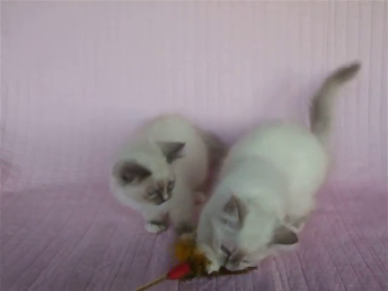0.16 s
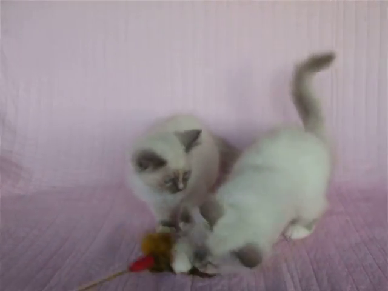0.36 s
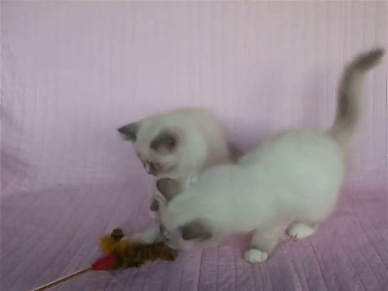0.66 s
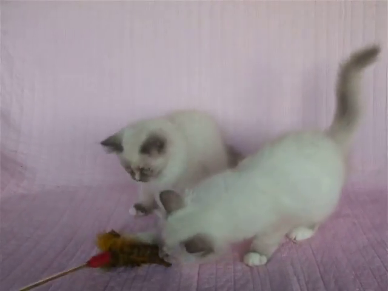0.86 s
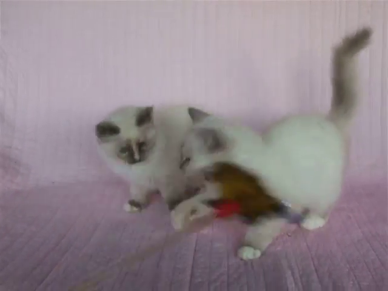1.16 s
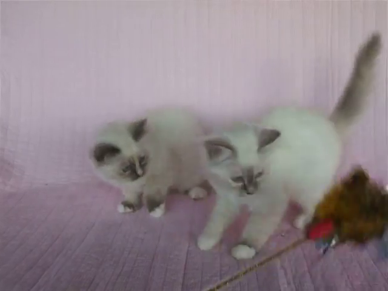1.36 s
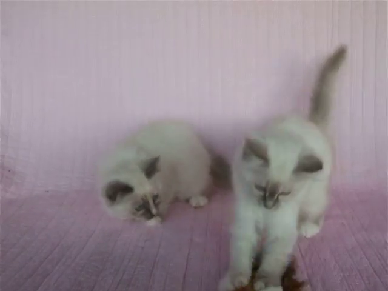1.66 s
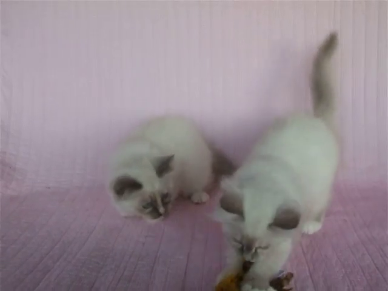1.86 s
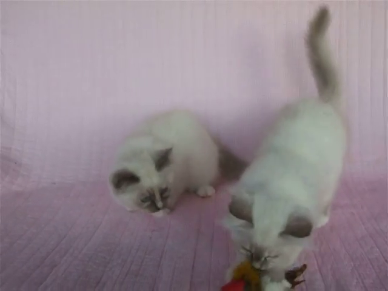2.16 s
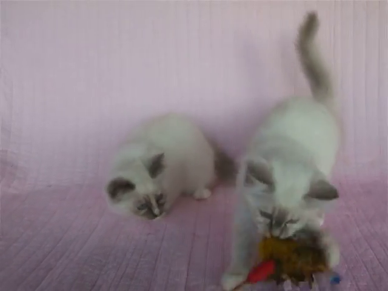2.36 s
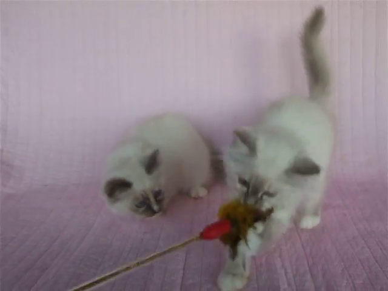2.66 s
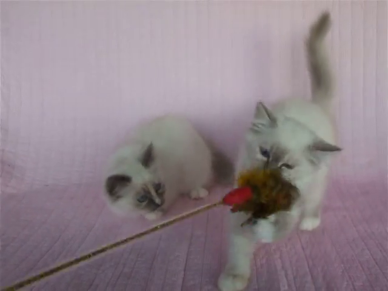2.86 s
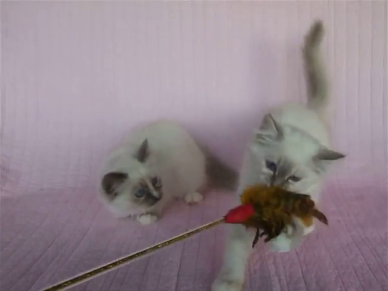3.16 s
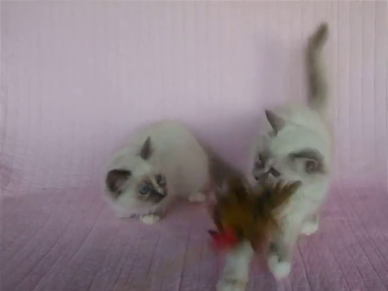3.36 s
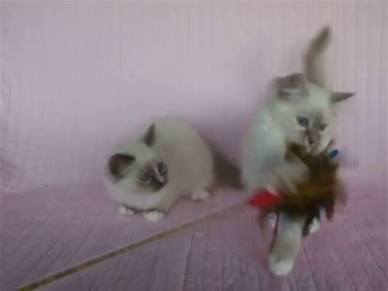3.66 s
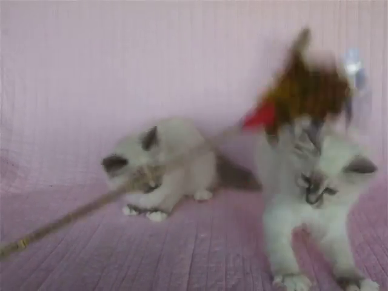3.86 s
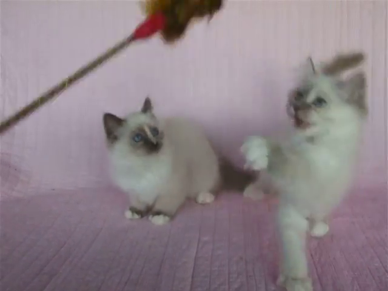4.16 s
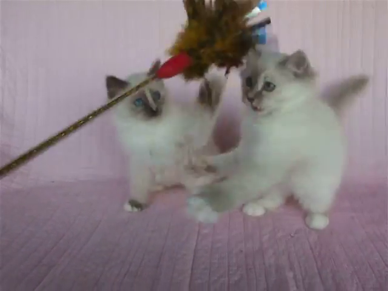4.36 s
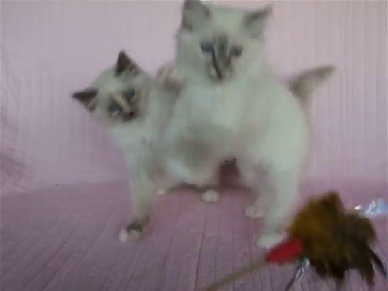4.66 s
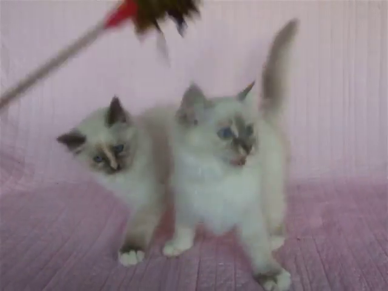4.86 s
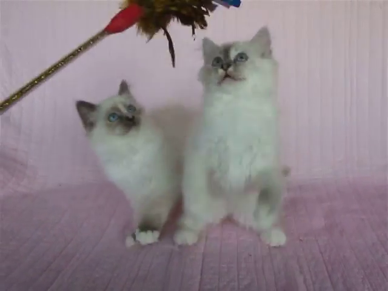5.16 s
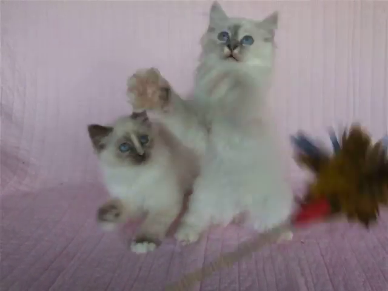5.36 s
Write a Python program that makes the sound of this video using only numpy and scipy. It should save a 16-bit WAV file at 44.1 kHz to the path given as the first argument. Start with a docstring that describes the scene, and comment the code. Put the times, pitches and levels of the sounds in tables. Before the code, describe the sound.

Quiet start with ticking camera focus motor, then bursts of crisp feathery rustle, sharp claw clicks and muffled paw thuds in a small room.

```python
"""Feathers and foil strips of a toy wand swish across a carpet, close to a small camera, as two kittens scrabble.
Each swish is a shower of tiny crackles ringing in the barbs, over duller friction; claws snap and tick
as short rings, cracks and taps, and paws land as damped thuds in a small quiet room.
The camera's focus motor ticks along in short steps, as rings and rasps on a fixed clock.
Beneath lie a low hum, a thin whine, rumble and microphone hiss, with a faint squeak and a whirr."""
import sys
import numpy as np
from scipy import signal
from scipy.fft import rfft, irfft
from scipy.io import wavfile
from scipy.ndimage import uniform_filter1d

SR = 44100
rng = np.random.default_rng(int(sys.argv[2]) if len(sys.argv) > 2 else 0)


def wrap_up_sound(samples):
    """Save the sound to the file named by the first command line argument, as 16-bit audio."""
    columns = np.atleast_2d(samples).T
    # keep every value between -1 and 1, then stretch to whole-number steps
    tamed = np.clip(columns, -1, 1)
    steps = np.round(tamed * 32767).astype(np.int16)
    wavfile.write(sys.argv[1], SR, steps)


N = 243873
TIME = np.arange(N) / SR  # [s]


def amp(db):
    """Decibels to gain."""
    return 10 ** (np.asarray(db) / 20)


def unit(x):
    """Scale to rms 1."""
    return x / np.sqrt(np.mean(x ** 2))


def colour(x, points, size=4096):
    """Causal minimum-phase filter through (frequency [Hz], gain [dB]) points; keeps the power of white noise."""
    hz, db = np.transpose(points)
    f = np.arange(size + 1) * SR / (2 * size)
    gain = unit(amp(np.interp(np.log(f + 1), np.log(hz), db)))
    cepstrum = irfft(np.log(gain))
    # folding the cepstrum forward in time makes the filter causal
    cepstrum[1:size] *= 2
    cepstrum[size + 1:] = 0
    impulse = irfft(np.exp(rfft(cepstrum)))[:size]
    return signal.oaconvolve(x, impulse)[:N]


def resonate(x, hz, width_hz):
    """One resonance, gain 1 at its centre."""
    b, a = signal.iirpeak(hz, hz / width_hz, fs=SR)
    return signal.lfilter(b, a, x)


def ring(x, hz, width_hz):
    """A resonance applied twice: it builds up over a few cycles and has steep skirts; rms 1."""
    return unit(resonate(resonate(x, hz, width_hz), hz, width_hz))


def narrow(hz, width_hz):
    """A narrow band of noise, rms 1."""
    return ring(rng.standard_normal(N), hz, width_hz)


def walk(rate):
    """Smooth random drift of rms 1, with rate new values a second."""
    k = int(SR / rate)
    held = np.repeat(rng.standard_normal(N // k + 1), k)
    return unit(uniform_filter1d(held, k)[:N])


def swell(t, rise, fall):
    """An envelope that grows up to t = 0 and dies away after it."""
    return np.exp(-np.minimum(np.maximum(-t / abs(rise), t / abs(fall)), 20))


def push(t, peak_s):
    """An envelope that reaches 1 after peak_s and falls off more slowly."""
    return t / peak_s * np.exp(1 - t / peak_s)


def add(out, s, sound):
    """Mix a short sound in at time s."""
    i = max(int(s * SR), 0)
    out[i:i + len(sound)] += sound[:max(N - i, 0)]


def crackle(rate, spread_db, smooth):
    """Tiny slips of unequal size, rate a second, plus a share of smooth friction; even in power."""
    chance, size, friction = rng.random(N), rng.exponential(size=N), rng.standard_normal(N)
    at = chance < rate / SR
    slips = np.zeros(N)
    slips[at] = np.sign(friction[at]) * amp(spread_db * np.minimum(size[at], 3.0))
    return unit(unit(slips / np.sqrt(rate)) + smooth * friction)


# every stroke swells for a share of its length, sags as it loses speed, and dies away
SWISH_ATTACK_SHARE, SWISH_SAG_DB, SWISH_RELEASE_S = .25, 2.5, 0.0088


def stroke(t, length):
    """Level of one stroke: attack, a sagging hold of the given length, release."""
    attack = np.minimum(t / (SWISH_ATTACK_SHARE * length), 1)
    hold = amp(-SWISH_SAG_DB * np.minimum(t / length, 1))
    return attack * hold * np.exp(-np.maximum(t - length, 0) / SWISH_RELEASE_S)


# strokes of the feather toy: (start [s], length [s], relative level [dB])
STROKES = [(0.374, 0.092, -45), (0.498, 0.065, -45.5), (1.03, 0.071, -42.5), (1.215, 0.065, -38),
           (1.269, 0.058, -34.5), (1.422, 0.053, -38.5), (1.494, 0.028, -31), (1.529, .025, -38),
           (1.553, .01, -33.5), (1.642, 0.046, -40.5), (3.378, 0.033, -40), (3.44, .015, -26),
           (3.459, 0.051, -36.5), (3.555, 0.018, -37), (3.586, 0.021, -37), (3.641, 0.023, -36.5),
           (3.693, .025, -31.5), (3.72, 0.041, -29), (3.775, .035, -32.5), (3.827, 0.014, -26),
           (3.904, .02, -30), (3.93, .025, -33), (4.01, .03, -35), (4.054, .035, -39), (4.135, 0.058, -33),
           (4.287, .035, -34), (4.406, .035, -31.5), (4.564, 0.0088, -26.5), (4.573, .012, -23),
           (4.597, 0.058, -31), (4.896, .04, -40), (5.092, 0.025, -41), (5.24, .045, -40.5),
           (5.323, .022, -32), (5.343, .008, -21.5), (5.38, 0.0072, -40.5)]
# fur and feathers dragging on the carpet between strokes: (time [s], relative level [dB])
DRAG = [(0.0, -54), (0.3, -59), (0.75, -64), (1.1, -48.5), (1.62, -47.5), (1.75, -59.5), (2.15, -67.5),
        (2.3, -53), (2.8, -59), (2.92, -50), (3.22, -54.5), (3.4, -47.5), (3.68, -46.5), (3.87, -41),
        (4.0, -47.5), (4.68, -42.5), (4.82, -48.5), (5.2, -50), (5.45, -45)]
# a stroke's dull body against its crisp top, thinner once the toy lifts off the carpet: (time [s], level [dB])
BODY_TO_TOP = [(0.4, -8), (1.1, -10), (1.55, -9.5), (1.67, -4), (3.4, -8), (4.0, -10.5), (4.2, -14.5),
               (4.65, -12.5), (5.33, -19), (5.45, -5)]
# rings of barbs and foil strips: (frequency [Hz], width of each pass [Hz], relative level [dB])
BARB_RINGS = [(3940, 1930, -5.5), (5320, 2030, -4), (6360, 2100, 1), (7080, 1880, 1), (7680, 2100, -2.5)]
# dull colour of carpet and fur, heard again in the claw taps: (frequency [Hz], relative gain [dB])
CARPET_COLOUR = [(100, -10), (300, -11.5), (550, -8), (900, -12.5), (1400, -4.5), (2200, 2.5), (3200, 1),
                 (5000, -14.5)]


def feathers(flutter_db=1.0):
    """Barbs and foil flick past each other: a crisp top, and a duller body where they rub on carpet and fur."""
    drag = amp(np.interp(TIME, *np.transpose(DRAG)) + flutter_db * walk(rate=31))
    stroke_power = np.zeros(N)
    for s, length, db in STROKES:
        add(stroke_power, s, (amp(db) * stroke(TIME[:SR // 4], length)) ** 2)
    body_to_top = amp(np.interp(TIME, *np.transpose(BODY_TO_TOP)))
    top_power = drag ** 2 + stroke_power
    body_power = (drag * amp(-9.5)) ** 2 + stroke_power * body_to_top ** 2
    # a harder stroke sets more barbs slipping; each size of barb rings at its own pitch
    rate = 850 * (top_power / amp(-45) ** 2) ** .18
    barbs = np.zeros(N)
    for hz, width, db in BARB_RINGS:
        barbs += amp(db) * ring(crackle(rate, spread_db=5.0, smooth=0.31), hz, width)
    top = unit(colour(barbs, [(1200, -17.5), (3000, -8.5), (4500, 1.0), (8000, -0.5), (11000, -9.5)]))
    body = colour(crackle(2.7 * rate, spread_db=2.5, smooth=0.62), CARPET_COLOUR)
    clumps = unit(amp(2.23 * walk(rate=430)))  # the barbs catch and let go in clumps
    return clumps * amp(0.5) * (top * np.sqrt(top_power) + body * np.sqrt(body_power))


# low hum that thins midway while its octave grows: (time [s], fundamental level [dB], octave level [dB])
HUM_LEVELS = [(0, -55.5, -67), (2.1, -56, -75), (3.3, -61.5, -63), (4.3, -56, -73.5), (5.53, -56, -72.5)]
# faint electronic whine: (frequency [Hz], level [dB])
WHINE_TONES = [(414, -85), (3875, -71.5), (7875, -66)]
# colour of the microphone hiss: (frequency [Hz], relative gain [dB])
HISS_COLOUR = [(70, -12), (125, -4.5), (400, -5), (560, -1.5), (700, -5), (900, -6), (1560, -6.5),
               (2030, -6), (2400, -7.5), (3900, -8.5), (4700, -8), (8000, -13)]
HUM_HZ, HISS_DB = 82.2, -51.0


def background():
    """A low hum with its octave and a thin whine share a slight pitch drift, over rumble and microphone hiss."""
    s, first_db, octave_db = np.transpose(HUM_LEVELS)
    phase = 2 * np.pi * np.cumsum(1 + 0.0012 * walk(rate=3)) / SR  # for a tone of 1 Hz
    hum = amp(np.interp(TIME, s, first_db)) * np.sin(HUM_HZ * phase)
    hum += amp(np.interp(TIME, s, octave_db)) * np.sin(2 * HUM_HZ * phase)
    whine = sum(amp(db) * np.sin(hz * phase) for hz, db in WHINE_TONES)
    hiss = colour(rng.standard_normal(N), HISS_COLOUR) * amp(0.55 * walk(rate=25))
    rumble = colour(rng.standard_normal(N), [(8, -11), (24, -3.5), (38, -12.5), (55, -10.5), (110, -13.5),
                                             (300, -40.0), (1000, -80.0)])
    tones = np.sqrt(2) * (hum + whine)  # the listed levels are rms
    return tones + amp(HISS_DB) * hiss + amp(-64.0) * rumble


# a narrow whirr: (time [s], level [dB])
WHIRR_LEVELS = [(2.5, -73), (2.63, -59), (3.2, -67.5), (4.8, -56.5), (5.1, -60), (5.2, -76)]


def squeak_and_whirr():
    """Two narrow bands of noise: a thin squeak at the start, and a faint whirr in the second half."""
    squeak = amp(-56) * swell(TIME - .03, rise=.04, fall=.025) * narrow(hz=3950, width_hz=130)
    whirr = amp(np.interp(TIME, *np.transpose(WHIRR_LEVELS))) * narrow(hz=2130, width_hz=250)
    return squeak + whirr


# paws landing on the carpet: (time [s], relative level [dB], thud pitch [Hz], rumble t60 [s])
LANDINGS = [(0.007, -40.5, 133, 0.19), (1.294, -40.5, 228, 0.072), (1.503, -39, 121, 0.12),
            (1.679, -45, 143, 0.13), (3.438, -36, 134, 0.16), (3.829, -40, 164, 0.1),
            (3.874, -35, 121, 0.043), (4.574, -45, 158, 0.12), (4.843, -30.5, 210, 0.08),
            (5.343, -40.5, 238, 0.047)]


def paws(thud_s=0.0069, scuff=0.44, slap_s=0.0011):
    """A soft pad slaps the pile and pushes the damped floor for a few cycles; a dull rumble trails behind."""
    thuds, slaps, tails = np.zeros(N), np.zeros(N), np.zeros(N)
    t = TIME[:SR // 4]
    heaviest_db = max(row[1] for row in LANDINGS)
    for s, db, hz, t60 in LANDINGS:
        grit = amp(db) * rng.standard_normal(len(t))
        weight = amp(1.1 * (db - heaviest_db))  # light landings barely reach the floor under the pile
        thud = np.sin(2 * np.pi * hz * t) * np.exp(-t / thud_s)
        add(thuds, s + slap_s, -weight * amp(db) * thud)
        add(slaps, s + slap_s, weight * grit * push(t, slap_s))
        add(tails, s, grit * np.exp(-np.log(1000) * t / t60))
    slap = colour(slaps, [(120, -5), (260, 2), (480, 2.5), (750, -1.5), (1500, 1), (2900, -3.5), (4200, -30.5)])
    rumble = colour(tails, [(80, -13.0), (190, -7.5), (330, -4.0), (580, 0.5), (1200, -14.5), (2800, -25.5),
                            (5000, -44.5)])
    return amp(1.0) * thuds + amp(-5.0) * slap + scuff * rumble


# single snaps of claws, quills and foil: (time [s], relative level [dB], ring pitch [Hz], tap trim [dB])
SNAP_EVENTS = [(0.1669, -26, 6330, -13), (1.505, -18, 5970, -11), (2.2014, -28.5, 6200, -11),
               (2.356, -27, 4600, -2), (2.543, -25.5, 4930, -2.5), (2.707, -16.5, 5700, -19),
               (3.0642, -28.5, 5100, -6), (3.325, -24.5, 5800, -1), (3.4335, -14.5, 6000, -15),
               (3.4452, -9.5, 6200, -14.5), (3.5926, -14.5, 6600, -15), (3.7573, -15.5, 6300, -11),
               (3.7834, -9.5, 6700, -29), (3.838, -13, 6550, -13), (4.128, -16.5, 6000, -18),
               (4.203, -17.5, 6860, -26), (4.442, -9.5, 7200, -23.5), (4.5717, -13, 7100, -19),
               (4.5759, -9, 5340, -9), (4.58, -12, 6240, -4), (4.8504, -21.5, 7140, -14),
               (5.349, -8, 6230, -13.5)]
# crisp colour of the cracks: (frequency [Hz], relative gain [dB])
CRACK_COLOUR = [(1500, -34), (3000, -31), (4000, -4), (5000, 3), (6200, -0.5), (7300, 4.5), (8200, -14),
                (9500, -5.5)]


def snaps(ring_s=0.00017, crack_s=0.00025, tap_s=0.00082, crack_share=.17):
    """A claw or quill lets go: a brief high ring, a crisp crack and a longer, duller tap on the carpet."""
    rings, cracks, taps = np.zeros(N), np.zeros(N), np.zeros(N)
    t = TIME[:SR // 100]
    for s, db, hz, tap_db in SNAP_EVENTS:
        grit = amp(db) * rng.standard_normal(len(t))
        add(rings, s, amp(db) * np.sin(2 * np.pi * hz * t) * push(t, ring_s))
        add(cracks, s, grit * push(t, crack_s))
        add(taps, s, amp(tap_db) * grit * push(t, tap_s))
    crack = crack_share * colour(cracks, CRACK_COLOUR)
    return amp(-3.0) * rings + crack + amp(-11.0) * colour(taps, CARPET_COLOUR)


# the focus motor hunts in runs of slow probing or quick steps: (start [s], steps, clock ticks between steps,
# relative ring level [dB], first ring pitch [Hz], climb per step [Hz], delay of the rasp [s])
MOTOR_RUNS = [(0.281, 1, 1, -42, 646, 0, .001), (0.315, 5, 1, -51.5, 659, -1, .021),
              (0.515, 5, 3, -46, 700, -5, 0.0089), (1.048, 5, 1, -48.5, 630, 21, .003),
              (1.249, 3, 3, -49.5, 647, 5, .011), (1.581, 5, 1, -48.5, 626, 19, .004),
              (2.349, 3, 3, -47.5, 646, 5, .012), (2.681, 5, 1, -49, 625, 23, .003),
              (3.548, 2, 3, -49, 645, -2, .008), (3.781, 5, 1, -49, 649, 23, .004),
              (4.415, 4, 1, -51, 658, 3, .019), (4.714, 3, 3, -50, 675, 2, .008),
              (5.047, 3, 1, -50, 630, 27, .003), (5.181, 3, 3, -51.5, 630, 0, .013)]
MOTOR_CLOCK_HZ = 30
# the higher the carriage rings, the more it rasps and the less it rings
REST_HZ, RASP_DB, RASP_DB_PER_HZ, RING_DB_PER_HZ = 642, -48, 0.0581, -0.032


def focus_steps():
    """Steps on the motor's clock: (time [s], ring level [dB], pitch [Hz], rasp level [dB], rasp delay [s])."""
    for start, count, ticks, db, first_hz, climb_hz, delay in MOTOR_RUNS:
        for k in range(round(count)):
            s = start + k * round(ticks) / MOTOR_CLOCK_HZ
            hz = first_hz + k * climb_hz
            above = hz - REST_HZ
            yield s, db + RING_DB_PER_HZ * above, hz, RASP_DB + RASP_DB_PER_HZ * above, delay


# resonances of the lens barrel: (frequency [Hz], width [Hz], relative level [dB])
BARREL_RINGS = [(1310, 82, -13), (1810, 190, 2.5), (2320, 280, 3), (3220, 190, 1.5), (4350, 450, 0),
                (4940, 370, -5.5)]


def focus_motor(push_s=0.0031, rasp_s=0.0037, glide=2.3, judder_s=0.014, stop_ratio=1.13,
                start_share=0.3, uneven=.2, wander_db=2.5):
    """Steps ring and judder the lens carriage; as it stops, it rasps through the barrel and rings higher."""
    rings, rasps, judders = np.zeros(N), np.zeros(N), np.zeros(N)
    t = TIME[:SR // 8]
    for s, ring_db, hz, rasp_db, delay in focus_steps():
        # the pitch rises as the carriage speeds up
        phase = 2 * np.pi * hz * np.cumsum(1 + glide * (t - 2 * push_s)) / SR
        stretch = np.exp(uneven * rng.standard_normal())  # no two steps take quite the same time
        add(rings, s, amp(ring_db) * push(t, push_s * stretch) * np.sin(phase))
        stop_ring = np.sin(2 * np.pi * hz * stop_ratio * t)
        add(rings, s + delay, amp(-62.0) * push(t, peak_s=0.0037) * stop_ring)
        add(judders, s, amp(ring_db) * push(t, judder_s))
        add(rasps, s, start_share * amp(ring_db) * push(t, peak_s=0.0019))
        add(rasps, s + delay - rasp_s, amp(rasp_db) * push(t, rasp_s))
    teeth = crackle(rate=5000, spread_db=5.5, smooth=0.33)
    barrel = np.zeros(N)
    for hz, width, db in BARREL_RINGS:
        barrel += amp(db + wander_db * walk(rate=20)) * resonate(teeth, hz, width)
    # the housing lets little treble through
    barrel = colour(unit(barrel), [(1000, -0.5), (5000, 0), (6500, -12)]) * amp(-5.5)
    carriage = colour(rng.standard_normal(N), [(120, -34.5), (260, 3.5), (520, 0.0), (760, 3.5), (1100, -28),
                                               (3000, -50.0)])
    return amp(6.0) * rings + amp(2.0) * rasps * barrel + amp(-13.0) * judders * carriage


def room(x, t60=0.17, wet_db=-13):
    """A small carpeted room: a weak, short tail of decaying noise."""
    t = TIME[:SR // 3]
    tail = rng.standard_normal(len(t)) * np.exp(-np.log(1000) * t / t60) * (t > .003)
    return x + amp(wet_db) * signal.fftconvolve(x, tail / np.linalg.norm(tail))[:N]


def scene():
    """The play sounds in the room; the motor reaches the microphone through the camera's body."""
    play = room(feathers() + snaps() + paws())
    return (play + focus_motor() + squeak_and_whirr() + background())[None]


def record(dry, top_hz=8400, offset=-.0026):
    """The camera cuts the top steeply; its converter rests slightly off zero."""
    taps = signal.firwin(101, top_hz, window=("kaiser", 7), fs=SR)
    return signal.fftconvolve(dry, taps[None], mode="same") + offset


dry = scene()
out = record(dry)
wrap_up_sound(out)
```